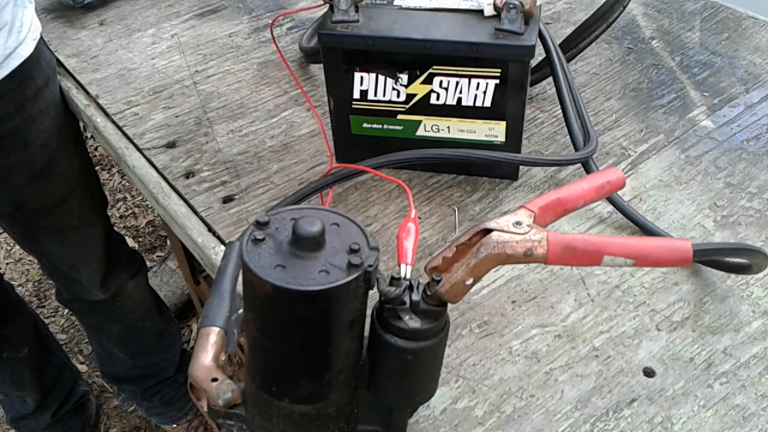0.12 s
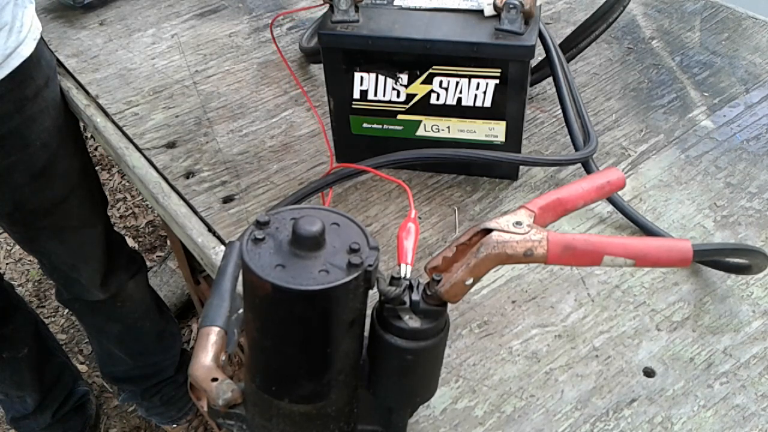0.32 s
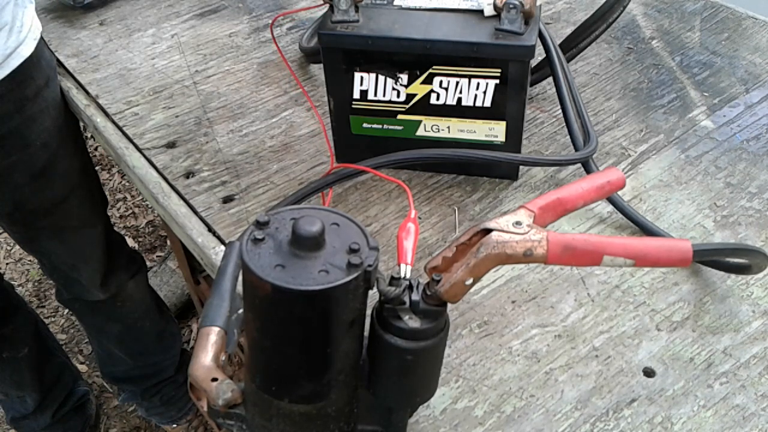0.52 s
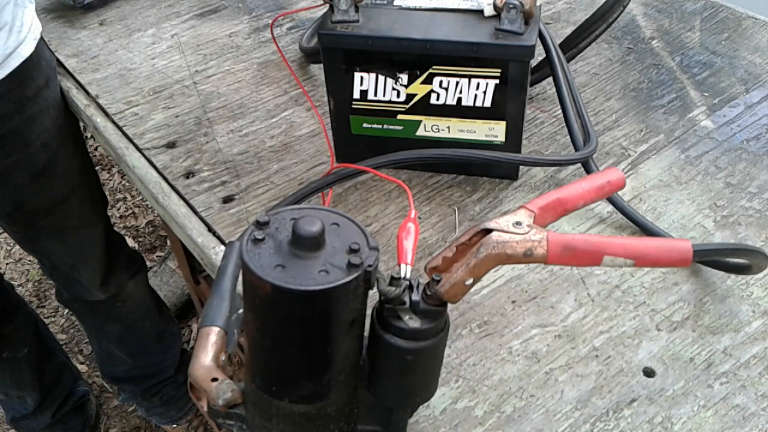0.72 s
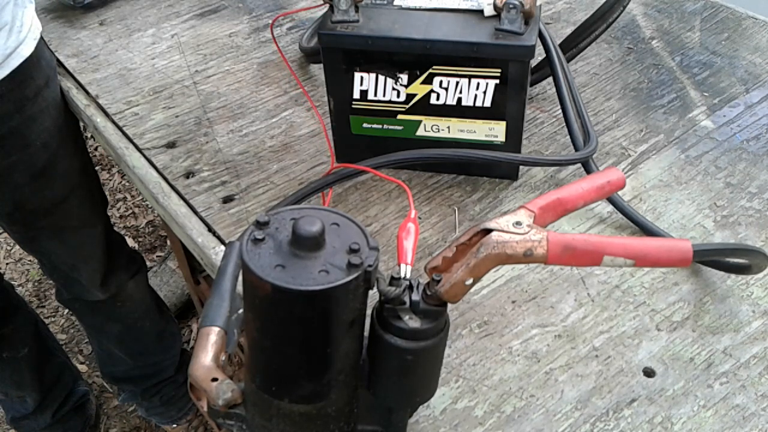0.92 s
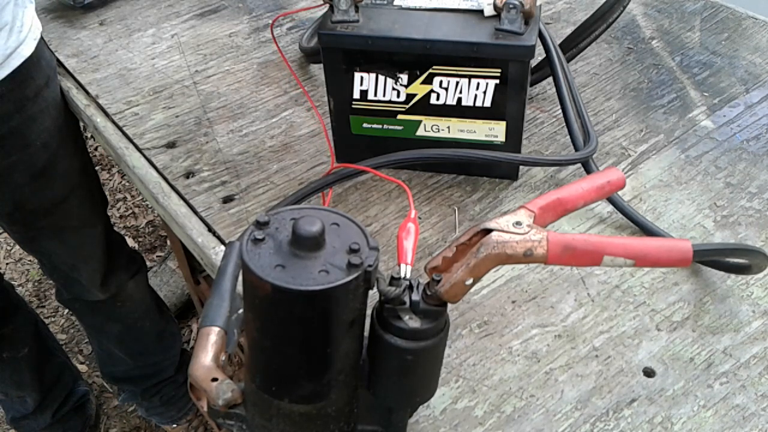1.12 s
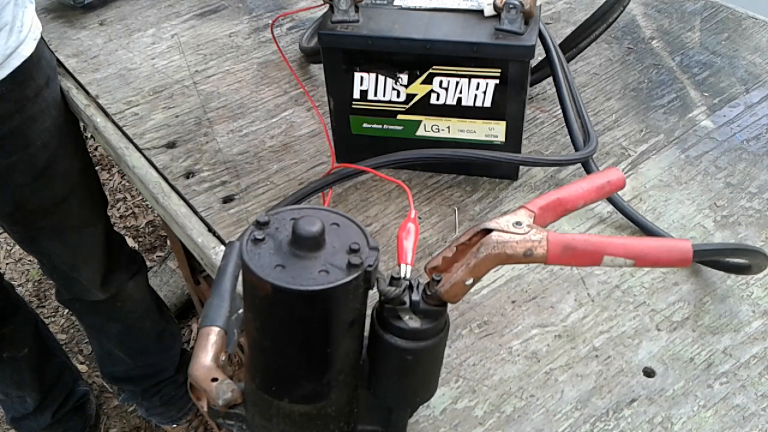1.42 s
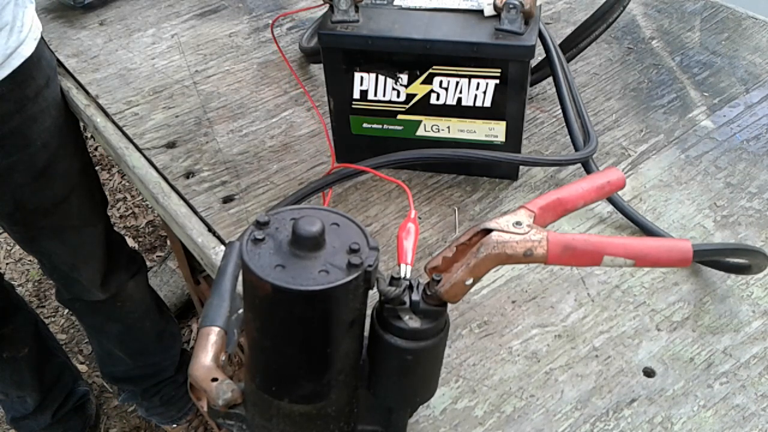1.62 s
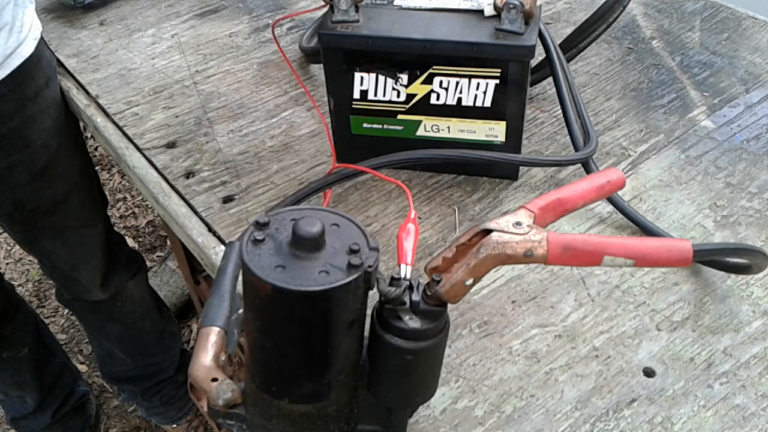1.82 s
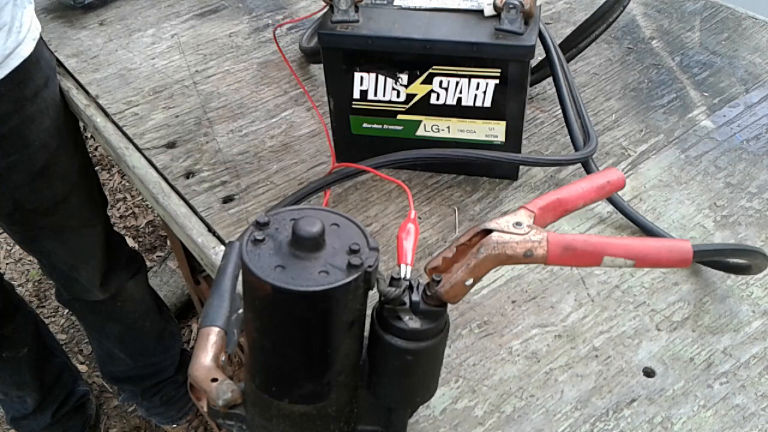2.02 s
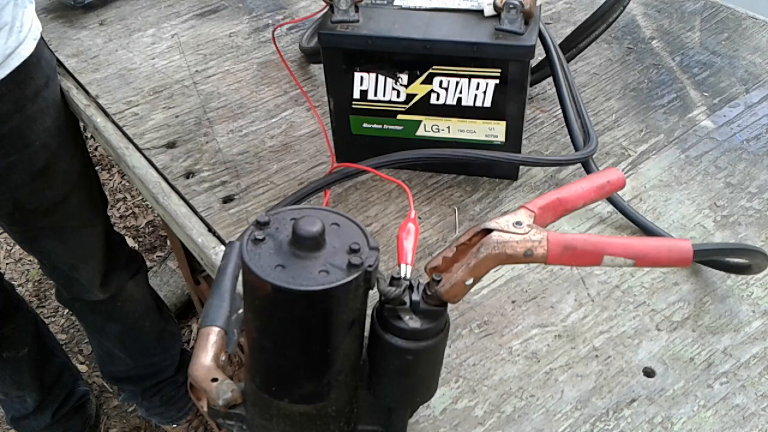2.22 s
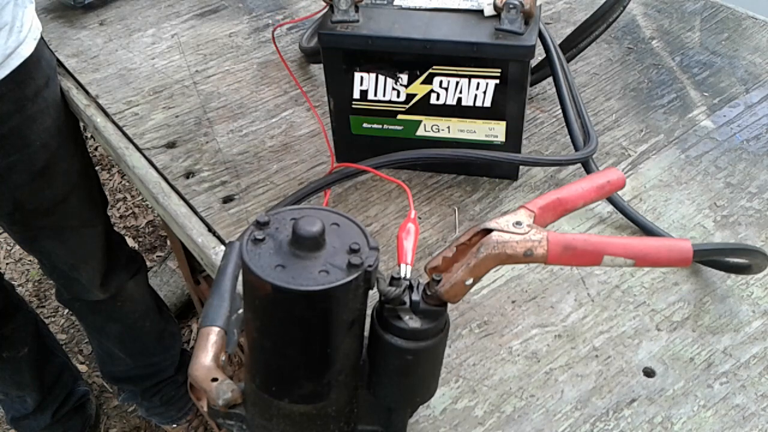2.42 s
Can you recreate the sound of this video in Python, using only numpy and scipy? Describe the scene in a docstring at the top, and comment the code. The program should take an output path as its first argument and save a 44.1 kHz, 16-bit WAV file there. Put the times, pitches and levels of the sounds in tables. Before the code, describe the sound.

A starter motor on a wooden bench: hard metallic solenoid clack with a dull thump, raspy whir rising fast to high speed, another clatter at power-off, then falling pitch. Close stereo microphone, dry, faint air noise.

```python
"""Starter motor on a bench

A starter motor is run once on a wooden bench, close to the microphone.
Its solenoid slams in (shaped noise bursts and steel modes) and jolts the bench (decaying sines).
The motor spins up: brushes rasp (pulsed noise through casing resonances), commutator whine rises (shaft tones).
Then the power is cut: the pinion clatters back and the motor coasts down. Faint room tail, quiet air noise."""
import sys
import numpy as np
from scipy import signal
from scipy.fft import rfft, irfft
from scipy.io import wavfile
from scipy.ndimage import uniform_filter1d

SR = 44100
rng = np.random.default_rng(int(sys.argv[2]) if len(sys.argv) > 2 else 0)


def master(y):
    """Save y as 16-bit WAV."""
    cut = np.clip(np.atleast_2d(y).T, -1, 1)
    pcm = np.round(cut * 32767)  # scale
    wavfile.write(sys.argv[1], SR, pcm.astype(np.int16))


N = 114660
T, HZ = np.arange(N) / SR, np.fft.rfftfreq(2 * N, 1 / SR)
ON_S, OFF_S = 0.27, 1.775
BARS = 28  # commutator bars per turn


def amp(db):
    """Decibels to gain."""
    return 10 ** (np.asarray(db) / 20)


def unit(x):
    """Scales to rms 1."""
    return x / np.sqrt(np.mean(x ** 2) + 1e-20)


def curve(points):
    """Control curve over time, linear between points."""
    return np.interp(T, *np.transpose(points))


def read(points, hz):
    """Reads a table on a log-frequency axis."""
    f, value = np.transpose(points)
    return np.interp(np.log(hz + 1), np.log(f + 1), value)


def colour(x, points):
    """Causal minimum-phase filter with the given spectrum."""
    log_gain = np.log(amp(read(points, abs(np.fft.fftfreq(4096, 1 / SR)))))
    spectrum = np.exp(np.conj(signal.hilbert(log_gain)))
    taps = np.fft.ifft(spectrum).real
    return signal.fftconvolve(x, taps[:len(taps) // 2])[:len(x)]


def add(mix, s, sound):
    """Mixes a sound in at s seconds."""
    part = mix[round(s * SR):][:len(sound)]
    part += sound[:len(part)]


def ports(left, other, lean=0.97):
    """The right port hears the sound later, shaded, and partly from other surfaces."""
    # Each row: frequency in Hz, left minus right in dB at lean = 1.
    shading = [(100, -2), (430, -1), (700, 0.4), (1100, 1), (1750, -2), (2100, -2), (2500, -3), (2850, 0),
               (3300, 9), (3900, 18), (4900, 8.2), (6200, 9.8), (7500, 4.6), (9000, 8), (10500, 2),
               (15000, 2)]
    # Each row: frequency in Hz, likeness of the two ports (0-1).
    likeness = [(150, 0.99), (300, 1), (600, 0.93), (1200, 0.73), (2400, 0.76), (4000, 0.3), (8000, 0.24),
                (15000, 0.22)]
    right_late_ms = 0.068
    same = np.clip(read(likeness, HZ), 0, 1)
    z = same * rfft(left, 2 * N) + np.sqrt(1 - same ** 2) * rfft(other, 2 * N)
    right = irfft(z * np.exp(-2j * np.pi * HZ * right_late_ms / 1000))[:N]
    return np.array([left, colour(right, [(f, -lean * db) for f, db in shading])])


def background():
    """Quiet air: steady coloured noise, one stream per port."""
    # Each row: frequency in Hz, relative level in dB per Hz.
    air_colour = [(18, -66), (30, -34), (81, -12.5), (105, -12.5), (260, -18), (581, -22), (698, -26.5),
                  (1200, -24), (5880, -43), (15000, -55)]
    level_db = -51.5
    left, other = (unit(colour(noise, air_colour)) for noise in rng.standard_normal((2, N)))
    return amp(level_db) * ports(left, other, lean=0.15)


def room(x):
    """Faint short tail from the surroundings: convolution with decaying, dulled noise."""
    level_db, t60_s = -22, 0.034
    t = T[:SR // 2]
    tail = rng.standard_normal((2, len(t))) * amp(-60 * t / t60_s) * (t > 0.004)
    tail = signal.lfilter(*signal.butter(1, 4000, fs=SR), tail)
    return amp(level_db) * signal.fftconvolve(x, tail / np.linalg.norm(tail[0]), axes=1)[:, :N]


def bench():
    """The kick of the motor thumps the planks, whose modes ring and decay."""
    # Jolts of the motor against the bench. Each row: start in seconds, gain on the thump in dB.
    jolts = [(0.2446, -17.5), (0.2527, -14.5), (1.7731, -18), (1.781, -12.5), (1.8068, -18)]
    # Plank modes. Each row: frequency in Hz, relative level in dB, t60 in seconds.
    plank_modes = [(89, -18.5, 0.2), (128.6, -3.5, 0.076), (164, -3, 0.068), (242.4, -9.5, 0.11),
                   (320, -8, 0.016)]
    t, out = T[:SR // 3], np.zeros(N)
    thump = -sum(amp(db - 60 * t / t60) * np.sin(2 * np.pi * hz * t) for hz, db, t60 in plank_modes)
    thump *= np.minimum(t / 0.0031, 1)  # 3.1 ms onset
    for s, db in jolts:
        add(out, s, amp(db) * thump)
    out = signal.sosfilt(signal.butter(3, 70, "high", fs=SR, output="sos"), out)
    return ports(out, 0 * out)


def steel(t, after_on):
    """Each blow lands a little differently, and so rings its own mix of the steel modes."""
    # Each row: frequency in Hz, relative level in dB for blows up to switch-on,
    # relative level in dB for later blows, t60 in seconds.
    steel_modes = [(1114, -18, 0, 0.092), (1600, -20, -12, .13), (1830, 3, -16, 0.072),
                   (2030, 9, -9, 0.064), (2380, -10, 3, .09), (3200, 14, -20, 0.072), (3900, -10, -3, 0.1),
                   (4120, -2, -14, 0.051), (5330, -22, -1, 0.045), (5960, 1, -16, 0.059)]
    spread_db = 1.5
    hz, before_db, after_db, t60 = np.transpose(steel_modes)[:, :, None]
    db = (after_db if after_on else before_db) + spread_db * rng.standard_normal(hz.shape)
    phase_turns = rng.random(hz.shape)
    modes = amp(db - 60 * t / t60) * np.sin(2 * np.pi * (hz * t + phase_turns))
    return unit(modes.sum(0))


def solenoid():
    """Each blow is a sharp contact and a brief chatter of loose steel parts."""
    # Blows of plunger and pinion. Each row: start in seconds, then knock, clack, clink and snap
    # in dB before the common gain, chatter decay constant in seconds.
    blows = [(0.2228, -43, -40, -41, -62, .006), (0.2281, -28, -41, -20, -48, 0.0022),
             (0.2297, -23, -35, -19.5, -37, 0.0032), (0.2388, -24, -15, -12.5, -17, .0016),
             (0.2434, -24, -18, -24, -26, 0.0024), (0.2489, -25, -26, -26, -44, 0.012),
             (.253, -21.5, -37, -19, -46, 0.0093), (0.261, -29.5, -25, -27.5, -26, .004),
             (0.518, -33, -35, -45, -46, 0.0028), (0.6152, -35.5, -34, -26.5, -48, 0.0011),
             (1.7723, -30, -21.5, -19, -31, 0.0039), (1.778, -25, -26, -18, -44, 0.0064),
             (1.7853, -21.5, -25, -25, -42, 0.009), (1.7886, -27.5, -24, -39, -46, 0.0028),
             (1.798, -17.5, -21, -17, -25, 0.0017), (1.8121, -35, -23, -23, -43, 0.0038),
             (1.8294, -27, -17, -39, -34, 0.0034), (1.8525, -30, -37, -28, -35, 0.0016)]
    # Four bands of each blow, low to high: dull knock, clack, bright clink, sharp snap.
    # Each row: frequency in Hz, relative level in dB per Hz.
    knock_colour = [(100, -17.5), (320, 2.5), (650, -2.5), (1150, 2), (1500, -9), (3000, -33), (8000, -55)]
    clack_colour = [(300, -24), (1450, -6), (1750, 4), (1900, 7.5), (2080, 2.5), (2400, -6.5), (2900, -8.5),
                    (4000, -21), (8000, -69)]
    clink_colour = [(500, -28.5), (2400, -5.5), (3200, -7), (3850, 6.5), (4300, 0), (5000, -13),
                    (6100, -10), (7500, -27.5), (15000, -36.5)]
    snap_colour = [(1000, -1), (4000, -13.5), (5300, 9), (6200, 10), (7600, -4), (9700, -11.5),
                   (11000, -12.5), (13300, -24), (15500, -14.5)]
    ring_db, common_gain = -7, 0.15
    t, out = T[:SR // 5], np.zeros((2, N))
    contact = t == 0  # single-sample click
    for s, knock_db, clack_db, clink_db, snap_db, decay_s in blows:
        for side, noise in zip(out, rng.standard_normal((2, len(t)))):
            chatter = noise * (np.exp(-t / decay_s) + 0.03 * np.exp(-t / 0.015))
            knock = unit(colour(chatter + 4 * contact, knock_colour))
            clack = unit(colour(chatter + 7 * contact, clack_colour))
            clack += amp(ring_db) * steel(t, s > ON_S)
            clink = unit(colour(chatter + 3 * contact, clink_colour))
            snap = unit(colour(chatter, snap_colour))
            blow = amp(knock_db) * knock - amp(clack_db) * clack
            blow += amp(clink_db) * clink + amp(snap_db) * snap
            add(side, s, common_gain * blow)
    return ports(*out, lean=0.89)


def tone(turns, rough, size):
    """A shaft tone of rms near 1 that flutters in level and phase, smoothed over size samples."""
    a, b = (unit(uniform_filter1d(v, size=size)) for v in rng.standard_normal((2, N)))
    angle = 2 * np.pi * turns
    flutter = (1 + rough * a) * np.cos(angle) + rough * b * np.sin(angle)
    return np.sqrt(2 / (1 + 2 * rough ** 2)) * flutter


def commutator_whine(turns):
    """The bars passing the brushes whine, flaring as the tone sweeps through casing resonances."""
    # Each row: time in seconds, level in dB.
    whine_db = [(.31, -56), (.355, -44), (.38, -33), (.397, -34), (.415, -25.5), (.445, -26), (.485, -32),
                (.52, -43), (.565, -28.5), (.615, -34), (.7, -54), (.85, -60), (.97, -50), (1.19, -42),
                (1.34, -57), (1.85, -54), (1.9, -44), (2.07, -48), (2.145, -39), (2.19, -54), (2.26, -39),
                (2.36, -37.5), (2.395, -47), (2.44, -33.5), (2.49, -41), (2.555, -32), (2.6, -48)]
    # Extra on the right, as the casing radiates unevenly. Each row: time in seconds, gain in dB.
    right_db = [(.45, -1), (.55, 1), (2.4, 1), (2.47, 8), (2.56, 1.5)]
    whine = amp(curve(whine_db)) * tone(BARS * turns, rough=0.24, size=600)
    whine *= 1 + 0.2 * np.cos(2 * np.pi * turns)  # once-a-turn pulse
    return ports(whine * (T > ON_S), 0 * T, lean=0.75) * amp([0 * T, curve(right_db)])


def rotor(speed, turns):
    """Once-a-turn hum of the unbalanced rotor, and weaker tones at multiples of the shaft speed."""
    # Hum. Each row: time in seconds, level in dB.
    hum_db = [(.4, -70), (.52, -50), (.7, -47), (.9, -64), (1.2, -58), (1.37, -46), (1.62, -41),
              (1.76, -42), (1.9, -62), (2.15, -47), (2.42, -47), (2.6, -57)]
    # Weaker tones: multiples of the shaft speed, and their levels in dB before radiation and speed.
    multiples = [13, 20, 22, 35, 41, 52, 54, 55, 56, 61, 64, 68, 70, 84]
    multiple_db = [-47, -74, -42, -66, -64, -59, -82, -64, -65, -62, -66, -61, -67, -60]
    # How well the weaker tones radiate. Each row: frequency in Hz, gain in dB.
    radiates = [(1500, -12), (3000, 5), (5000, -11), (7000, 13), (8600, 5), (10000, 2), (11300, -17),
                (12300, 0), (14000, -8), (15400, -13)]
    powered_db = -4  # weaker tones while powered
    hum = amp(curve(hum_db)) * tone(turns, rough=0.22, size=2200)
    faint = 0
    for k, db in zip(multiples, multiple_db):
        faint = faint + amp(db + read(radiates, k * speed)) * tone(k * turns, rough=1.0, size=500)
    faint = faint * amp(powered_db * (T < OFF_S)) * (speed / speed.max()) ** 2.1
    x = (hum + faint) * (T > ON_S)
    return ports(x, 0 * x, lean=0.84)


def brushes(turns):
    """Grainy, surging friction, pulsing with each turn and each commutator bar, rings the casing."""
    # Each row: time in seconds, level in dB before surge and treble.
    rasp_db = [(.27, -33.5), (.34, -33.5), (.44, -31), (.53, -30), (.63, -28.5), (.77, -32.5), (.95, -31),
               (1.15, -30), (1.3, -30), (1.47, -27.5), (1.75, -27.5), (1.9, -27), (2.08, -29), (2.2, -31.5),
               (2.4, -33.5), (2.6, -35.5)]
    # Gain above about 3 kHz. Each row: time in seconds, gain in dB.
    treble_db = [(.3, -5), (.55, 2.5), (1, 0.5), (1.7, 2.5), (2.15, 0.5), (2.4, -1), (2.6, 1.5)]
    # Colour of the running motor. Each row: frequency in Hz, relative level in dB per Hz.
    casing = [(30, -58), (60, -52), (90, -20), (130, -1.5), (190, -13), (270, -1), (340, -4.5), (430, -1.5),
              (590, 2), (680, -13), (900, -5.5), (1100, -3), (1450, -9.5), (1750, -5.5), (2050, -3.5),
              (2500, -2), (2850, -6), (3300, -3.5), (3650, -4), (3900, 1), (4250, -7.5), (4550, -7),
              (4850, -11), (5600, -13.5), (6200, -12.5), (6900, -21), (8500, -24), (10500, -30.5),
              (13000, -38), (15500, -36)]
    # Narrow casing resonances. Each row: frequency in Hz, width in Hz, gain in dB on the coloured rasp.
    casing_modes = [(439, 28, -2.5), (707, 72, 8.5), (893, 64, -5.5), (1177, 55, -14), (2028, 17, -10.5),
                    (2450, 36, -6.5), (2744, 41, -6.5), (3855, 74, -3), (4050, 140, -15), (4370, 52, -5.5),
                    (6120, 90, -3)]
    turn_depth, bar_depth = 0.057, 0.22
    grain_db, surge_db = 3, 0.7  # rms
    pulse = 1 + turn_depth * np.cos(2 * np.pi * turns) + bar_depth * np.cos(2 * np.pi * BARS * turns)
    grain = amp(grain_db * unit(uniform_filter1d(rng.standard_normal(N), size=24)))
    surge = unit(uniform_filter1d(rng.standard_normal(N), size=900))
    fade_in = np.clip((T - ON_S) / 0.012 + 1, 0, 1)  # 12 ms, full at switch-on
    level = amp(curve(rasp_db) + surge_db * surge) * fade_in
    high_pass = signal.butter(2, 3000, "high", fs=SR, output="sos")
    pair = []
    for noise in rng.standard_normal((2, N)):
        x = colour(noise * pulse * grain, casing)
        ringing = sum(amp(db) * signal.lfilter(*signal.iirpeak(hz, hz / width, SR), x)
                      for hz, width, db in casing_modes)
        x = unit(x + ringing)
        treble = signal.sosfiltfilt(high_pass, x)
        pair.append(level * (x + (amp(curve(treble_db)) - 1) * treble))
    return ports(*pair)


def scene():
    """Motor, solenoid and bench, with their room tail, over a quiet background."""
    # Each row: time in seconds, shaft speed in turns per second.
    shaft_speed = [(.26, 1), (.3, 32), (.38, 79), (.42, 95), (.48, 113.5), (.56, 133), (.62, 145.5),
                   (.7, 161), (.8, 174), (.97, 190.3), (1.11, 200.9), (1.25, 209.2), (1.4, 216),
                   (1.6, 222.6), (1.775, 226), (1.97, 189), (2.15, 158.7), (2.32, 131), (2.46, 110),
                   (2.6, 90.8)]
    speed = curve(shaft_speed)
    turns = np.cumsum(speed) / SR
    starter = bench() + solenoid() + commutator_whine(turns) + rotor(speed, turns) + brushes(turns)
    return background() + room(starter) + starter


def record(dry):
    """The recorder rounds the highest peaks and limits the band."""
    limit, cut_hz = 0.95, 16050
    x = dry / (1 + (dry / limit) ** 4) ** 0.25
    low_pass = signal.firwin(511, cut_hz, window=("kaiser", 9), fs=SR)
    return signal.oaconvolve(x, low_pass[None], "same")


dry = scene()
out = record(dry)
master(out)
```